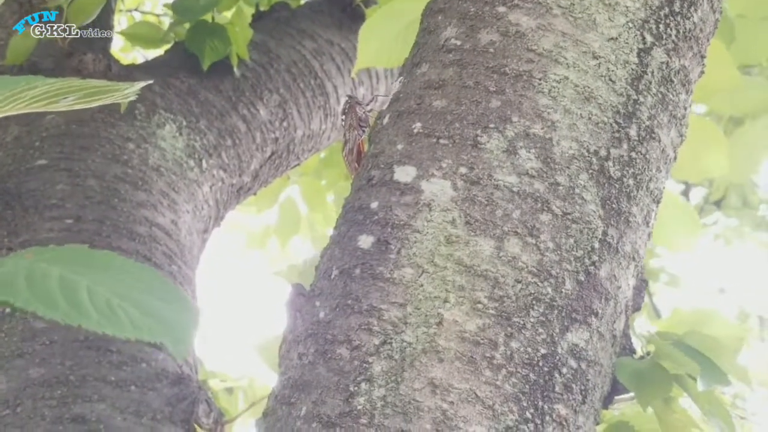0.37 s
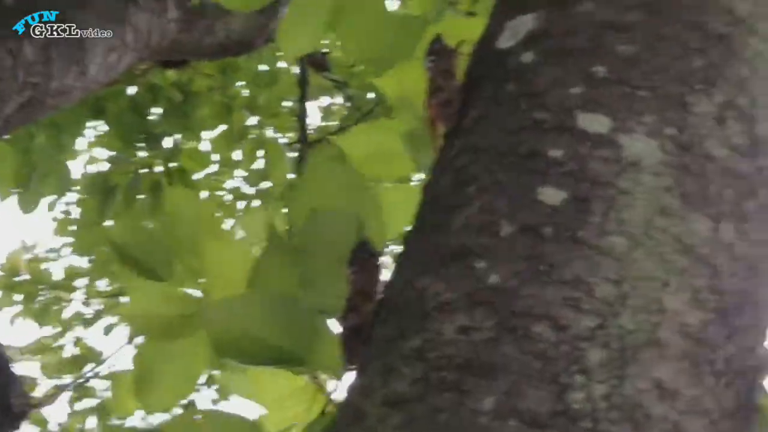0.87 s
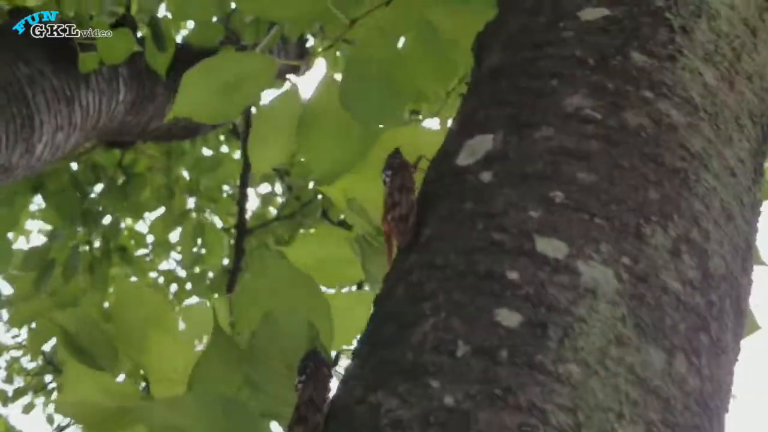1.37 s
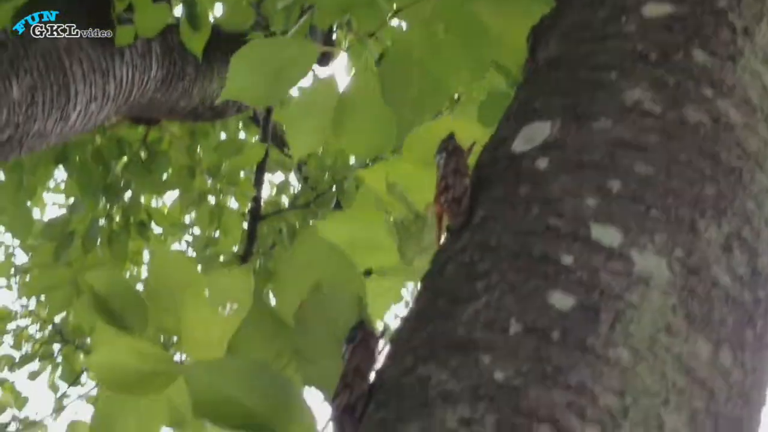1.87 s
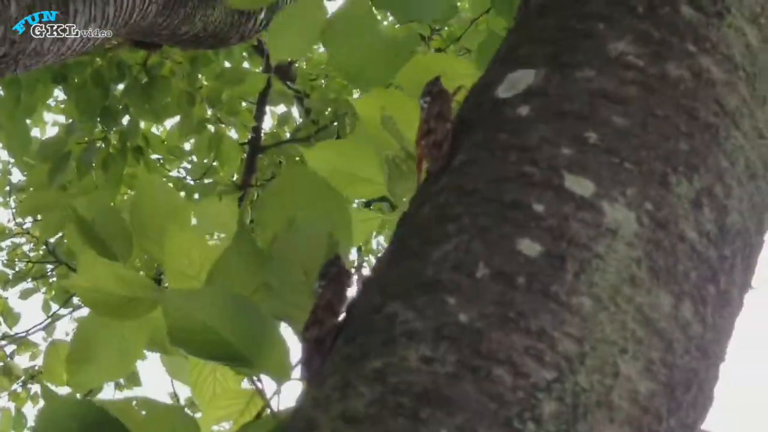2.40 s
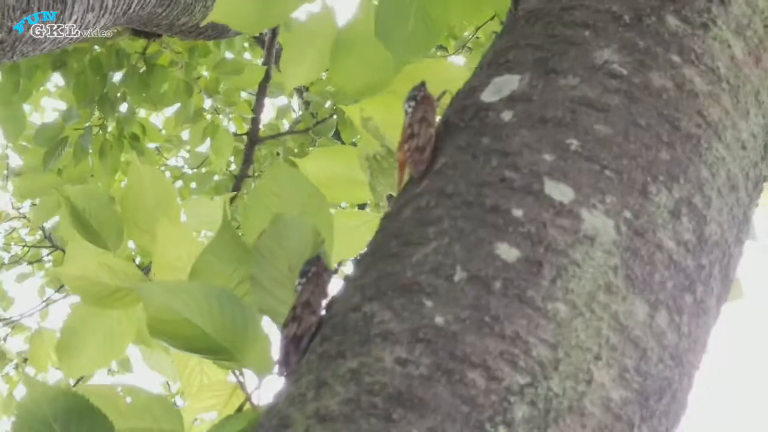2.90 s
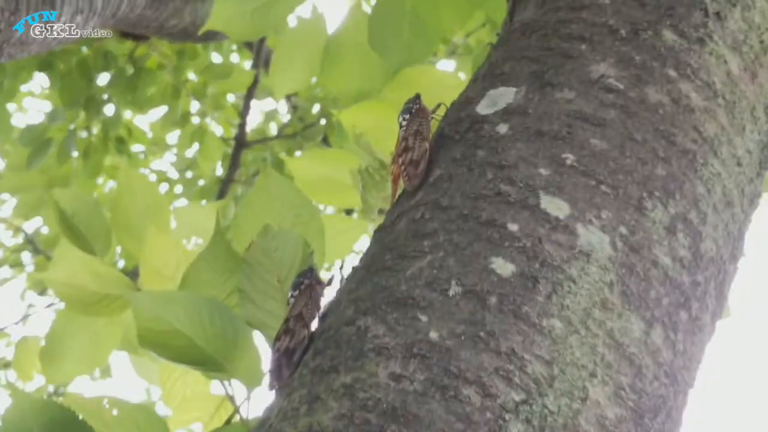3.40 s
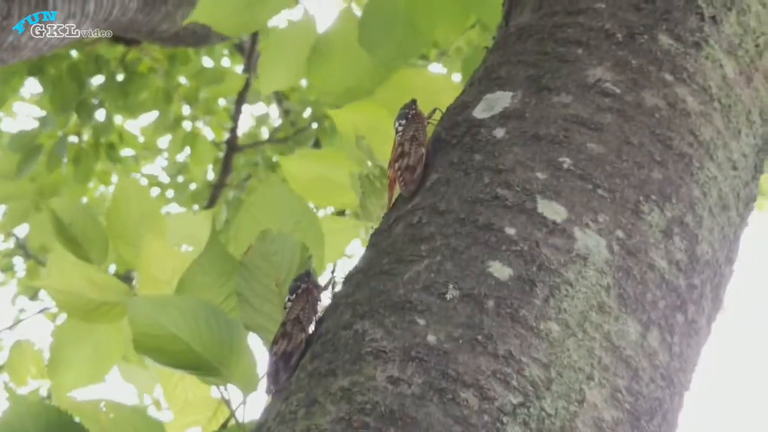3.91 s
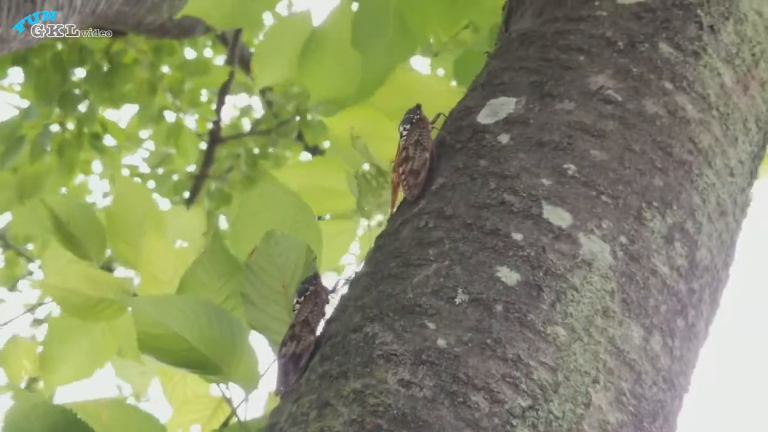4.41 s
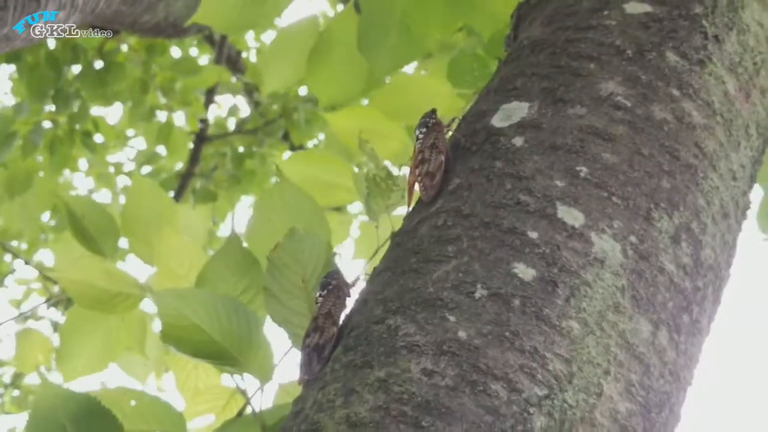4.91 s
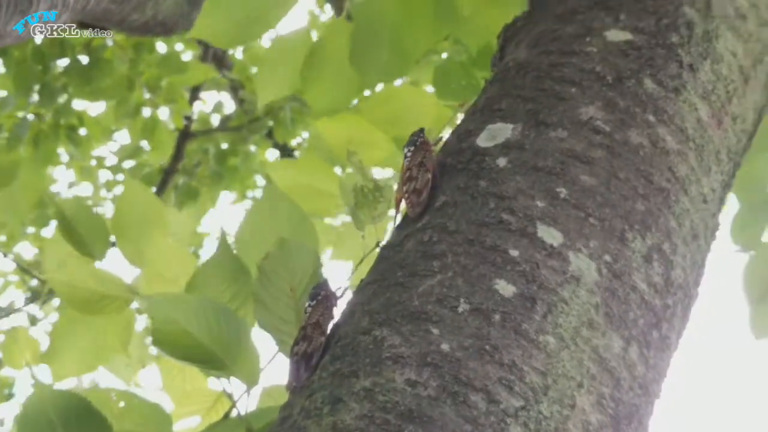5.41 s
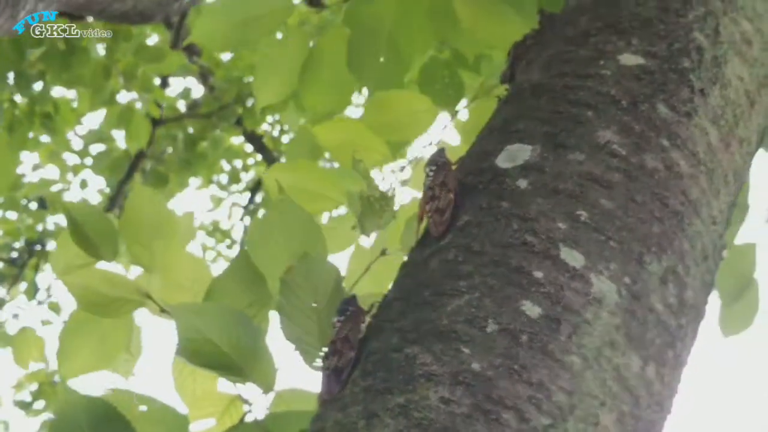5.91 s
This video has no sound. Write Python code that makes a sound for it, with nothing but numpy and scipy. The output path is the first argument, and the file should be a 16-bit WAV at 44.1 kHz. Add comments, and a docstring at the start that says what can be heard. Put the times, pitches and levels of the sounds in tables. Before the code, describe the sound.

Shrill, dense cicada song with a dry buzzing grain. First one insect wavers rapidly between lower and very high pitch; after half a second it stops, exposing another's brisk chirping syllables, each gliding upward, with longer ones closing phrases. At about 2.4 seconds the wavering buzz resumes, overlapping the syllables and slowly growing louder. Soft handling taps and wind buffets on a close stereo microphone recur every two seconds, over light distant insect hiss.

```python
"""A throbbing cicada, its pitch swinging 14 times a second, sings at the start, pauses, and returns at 2.37 s.
A second one sings short rising syllables; its two-second passage, with far chorus, wind and taps, loops.
Both voices are rib clicks ringing resonant modes, heard through a hand-held stereo microphone close by.
Shaped noise makes the far chorus and wind; short damped waves make finger taps and lumps of a gust."""
import sys
import numpy as np
from scipy import signal
from scipy.fft import rfft, irfft, next_fast_len
from scipy.io import wavfile
from scipy.ndimage import uniform_filter1d

SR = 44100
rng = np.random.default_rng(int(sys.argv[2]) if len(sys.argv) > 2 else 0)


def store_pcm(level_fs):
    """Save levels as 16-bit WAV."""
    pcm = np.round(np.clip(level_fs, -1, 1) * 32767).astype(np.int16)
    wavfile.write(sys.argv[1], SR, np.atleast_2d(pcm).T)


def amplitude_ratio(level_db):
    """Convert a level in decibels to the matching linear amplitude (field) ratio."""
    exponent = np.asarray(level_db, float) / 20
    return 10 ** exponent


N = 266143
TIME = np.arange(N) / SR

# Tymbal ribs buckling within one muscle cycle. Each row: share of the cycle, relative click level in dB
# into the low mode, the same into the high mode.
THROB_RIBS = [(0, 28.5, 12.5), (0.321, -7, -28), (0.517, 31, -16), (0.65, -34, 10)]
# Fixed resonances of the body. Each row: centre in Hz, width in Hz, relative level in dB,
# change in dB at full lift of the abdomen.
THROB_BODY = [(2300, 300, -36, 0), (4920, 330, -4, -13), (4250, 220, -21, -10), (8250, 350, -17, 2),
              (10000, 1500, -17, 0), (11650, 350, -11, 3), (13200, 900, -22, 26), (14400, 1100, -30, 32)]
# Level difference of the ports; the right one faces away. Each row: frequency in Hz, left minus right in dB.
THROB_BALANCE = [(2500, 2), (4800, 1.5), (5500, -3.5), (6000, 13.5), (7500, 11.5), (8500, 25), (10000, 1.5),
                 (12000, 14.5), (15500, 20)]
# Phase difference of the ports. Each row: frequency in Hz, lead of the left in radians.
THROB_PHASE = [(3600, .3), (4400, -2), (6500, .2), (16000, .4)]
# Steady paces of the pumping abdomen. Each row: start in seconds, time of one pitch top in seconds,
# swings per second.
SWING_PACE = [(0, .155, 13.95), (1, 2.195, 14.11), (3.683, 3.683, 13.84)]
# Stretches of song. Each row: start in seconds, end in seconds, fade-in in seconds, gain in dB at first.
THROB_SONG = [(-1, .528, .01, -20.8), (2.372, 7, .03, -22.8)]


def throbbing_cicada():
    """Frequency modulation by a pumping abdomen: lift slides the modes up and the high one flares at each top."""
    since, top, pace = np.transpose(SWING_PACE)
    row = np.searchsorted(since, TIME, "right") - 1
    swings = pace[row] * (TIME - top[row])
    lift = pumping(swings, late=.045, middle=0.45, depth=0.83, skew=0.99, smoothing=200)
    ease = 1 / (.0035 * SR)  # the abdomen eases into place with a 3.5 ms time constant
    lift = signal.lfilter([ease], [1, ease - 1], lift)
    flare = pumping(swings, late=.09, middle=0.51, depth=0.86, skew=0.98, smoothing=150)

    muscle_hz = 192.1 + .6 * np.sin(2 * np.pi * .7 * TIME)
    clicks = ribs(muscle_hz, THROB_RIBS, jitter=.0012, spread_db=1.0)
    low_hz, high_hz = 5550 + 2750 * lift, 12400 + 2900 * flare
    high_db = -15 + 28 * abs(flare) ** 0.26
    voice = song(clicks, lift, low_hz, high_hz, high_db, (450, 1000), THROB_BODY, hiss_db=-20.0)
    near = ports(voice * amplitude_ratio(-9.5), THROB_BALANCE, THROB_PHASE, left_echo_db=-11.0, right_echo_db=-22)

    far = far_chorus(THROB_BALANCE, patchy_db=3.5) + amplitude_ratio(-21) * thin_note()
    puff_colour = [(50, -2), (150, -6.0), (500, -6.5), (1300, -19.5), (2000, -16)]  # (Hz, relative dB per Hz)
    puffs = noise(puff_colour, [(50, 2.7), (900, 10.0)], same=0.26, patchy_db=3.0)
    puffs *= amplitude_ratio(-40.0 + 15.1 * lift)

    level = np.zeros(N)
    for start, end, fade, db in THROB_SONG:
        growth_db = 0.68 * np.maximum(TIME - max(start, 0), 0)  # the song swells by 0.68 dB per second
        fade_in = np.clip((TIME - start) / fade, 0, 1) ** 2
        level += amplitude_ratio(db + growth_db) * (TIME < end) * fade_in
    return (near + puffs + amplitude_ratio(-11) * far) * uniform_filter1d(level, size=100)


def pumping(swings, late, middle, depth, skew, smoothing):
    """Phase-skewed oscillation: a cosine of the swing count, limited to 0..1 and smoothed over some samples."""
    phase = 2 * np.pi * (swings - late) + skew * np.sin(np.pi * swings) ** 2
    return uniform_filter1d(np.clip(middle + depth * np.cos(phase), 0, 1), size=smoothing)


# Tymbal ribs of the syllable singer. Each row: share of the muscle cycle, relative click level in dB
# into the low mode, the same into the high mode.
SYLLABLE_RIBS = [(0, 9, 33), (0.199, -15, -11), (0.5, 6.5, -1), (0.718, 14.5, -24.5)]
# Fixed resonances of its body. Each row: centre in Hz, width in Hz, relative level in dB,
# change in dB per unit of lift (1500 Hz of glide).
SYLLABLE_BODY = [(2225, 310, -26.5, 2), (4809, 213, -3.5, -5.5), (5400, 410, -1, 0.5),
                 (8750, 2240, -11, 3.5), (10980, 1120, -12, 8), (11750, 480, -14.5, 12),
                 (15700, 3040, -4.5, 0)]
# Syllables; a long one closes each phrase. Each row: start in seconds, end in seconds, top pitch in Hz,
# timed before the passage is looped.
SYLLABLES = [(0.524, 0.543, 5690), (0.549, 0.623, 7046), (0.64, 0.677, 6080), (0.689, 0.721, 6260),
             (0.75, 0.781, 6413), (0.793, 0.828, 6294), (0.841, 0.889, 6390), (0.892, 0.949, 6960),
             (0.971, 1.008, 5955), (1.02, 1.05, 6350), (1.062, 1.106, 6060), (1.123, 1.16, 6210),
             (1.172, 1.213, 6250), (1.232, 1.316, 6900), (1.348, 1.369, 5785), (1.391, 1.421, 5950),
             (1.437, 1.473, 6126), (1.492, 1.526, 6056), (1.543, 1.576, 6094), (1.598, 1.64, 6205),
             (1.648, 1.714, 6990), (1.746, 1.77, 5780), (1.79, 1.821, 6144), (1.844, 1.87, 6060),
             (1.895, 1.92, 6090), (1.95, 1.981, 6050), (2.001, 2.026, 5950), (2.056, 2.14, 6786),
             (2.163, 2.192, 5400), (2.22, 2.243, 5924), (2.264, 2.299, 5900), (2.32, 2.347, 6020),
             (2.366, 2.397, 5795), (2.42, 2.459, 5820), (2.471, 2.521, 6570)]
# Level difference of the ports. Each row: frequency in Hz, left minus right in dB.
SYLLABLE_BALANCE = [(2500, 0), (4500, -4), (5600, 8.5), (6300, -1), (7200, 32.5), (8900, 38), (9800, 0),
                    (11000, 11.5), (12500, 20.5), (13500, 20), (15500, 16)]
# Phase difference of the ports. Each row: frequency in Hz, lead of the left in radians.
SYLLABLE_PHASE = [(2600, 0), (4500, 2.4), (5700, 3.8), (6600, 6.3), (16000, 6.6)]


def syllable_cicada():
    """A gliding resonance under a gate: each syllable starts abruptly, glides to its top and sags."""
    base_hz, high_syllable_hz = 5500, 6450
    hz, gate = np.full(N, float(base_hz)), np.full(N, amplitude_ratio(-77.0))
    last_start, last_end, last_hz = 0, 0, 0
    for start, end, top_hz in SYLLABLES:
        span = (TIME >= start) & (TIME < end)
        joined = start - last_end < .01  # follows without a gap
        after_stub = last_end - last_start < .025
        # share of the length at which the top comes: high syllables and those joined to a stub arch over
        if joined and after_stub:
            share = .56
        elif top_hz > high_syllable_hz:
            share = .72
        else:
            share = .84
        t, top = TIME[span], start + share * (end - start)
        rising = t < top
        glide = np.where(rising, (t - start) / (top - start), 1 - ((t - top) / .033) ** 2)
        glide += .4 * glide * (1 - glide) * rising  # bowed upward
        head_hz = 447.5 * (joined and not after_stub) * rising  # a joined syllable starts higher
        hz[span] += head_hz + (top_hz - base_hz - head_hz) * np.clip(glide, 0, 1)
        gate[span] = amplitude_ratio(-24.5 - 2.5 * (last_hz > high_syllable_hz))  # weaker after a high one
        last_start, last_end, last_hz = start, end, top_hz
    gate = signal.lfilter([.02], [1, -.98], gate)  # short ring-off
    hz = uniform_filter1d(hz, size=150)

    clicks = ribs(178 + .004 * (hz - base_hz), SYLLABLE_RIBS, jitter=.002, spread_db=2.5)
    lift = (hz - base_hz) / 1500
    high_db = -15 + 22 * np.tanh(lift / 0.37)  # the near-octave grows as the pitch rises
    voice = song(clicks, lift, hz, 1.984 * hz, high_db, (420, 700), SYLLABLE_BODY, hiss_db=-10)
    return ports(amplitude_ratio(-2.0) * gate * voice, SYLLABLE_BALANCE, SYLLABLE_PHASE,
                 left_echo_db=-10, right_echo_db=-2)


def song(clicks, lift, low_hz, high_hz, high_db, widths, body, hiss_db):
    """Source and filter: clicks with hiss ring two sliding modes and the fixed resonances of the body."""
    low, high = (evened(c) + amplitude_ratio(hiss_db) * rng.standard_normal(N) for c in clicks)
    fixed = np.zeros(N)
    for hz, width, db, change_db in body:
        fixed += amplitude_ratio(db + change_db * lift) * ring(low, hz, width)
    return ring(low, low_hz, widths[0]) + amplitude_ratio(high_db) * ring(high, high_hz, widths[1]) + fixed


def ribs(rate_hz, pattern, jitter, spread_db):
    """Impulsive excitation: the ribs click in every muscle cycle, with uneven timing (share of a cycle) and level."""
    cycles = np.cumsum(rate_hz * np.ones(N)) / SR
    starts = np.arange(int(cycles[-1]))
    out = np.zeros((2, N))
    for share, low_db, high_db in pattern:
        late, low, high = rng.standard_normal((len(starts), 3)).T
        at = np.interp(starts + share + jitter * late, cycles, np.arange(N)).astype(int)
        out[:, at] += amplitude_ratio([low_db + spread_db * low, high_db + spread_db * high])
    return out


def ring(x, hz, width):
    """Damped resonance: shifts the curve hz to zero, lets x decay there through three poles, and shifts back."""
    turn = np.exp(2j * np.pi * np.cumsum(hz * np.ones(N)) / SR)
    r = np.exp(-np.pi * width / SR)
    poles = np.poly([r, r ** 2, r ** 3])  # three poles give steep skirts
    return evened((turn * signal.lfilter([1], poles, x / turn)).real)


def ports(x, balance, phase, left_echo_db, right_echo_db):
    """Scattering and directivity: short scattered echoes whose colour changes slowly; ports differ."""
    lag = np.arange(int(.04 * SR)) / SR
    t60_s, turns_per_s = .022, 0.826
    echo = rng.standard_normal((3, 2, len(lag))) * amplitude_ratio(-60 * lag / t60_s) * (lag > .0005)
    echo *= amplitude_ratio([[left_echo_db], [right_echo_db]]) / np.linalg.norm(echo[0, 0])
    # three echo patterns alternate, a third of a turn apart
    turn = np.sqrt(2 / 3) * np.cos(2 * np.pi * (turns_per_s * TIME + np.arange(3)[:, None] / 3))
    echoes = signal.oaconvolve((x * turn)[:, None], echo, axes=2).sum(0)[:, :N]
    left, right = x + echoes
    size = next_fast_len(N)
    hz = np.fft.rfftfreq(size, 1 / SR)
    turned = rfft(right, size) * np.exp(-1j * read(phase, hz)) / amplitude_ratio(read(balance, hz))
    return np.array([left, irfft(turned, size)[:N]])


# Finger taps near the right port. Each row: time in seconds, peak in dB (mean of both ports),
# frequency in Hz once the first push has settled.
TAPS = [(.858, -39, 193), (1.254, -25.5, 176), (1.493, -27, 232.8), (2.142, -27, 168.9), (2.17, -32, 127.9)]


def finger_taps():
    """Damped oscillation after an impulse: a sharp low push and a cycle of recoil, mostly on the right."""
    out, t = np.zeros((2, N)), np.arange(1500) / SR
    rise_s = 0.00017
    for s, db, hz in TAPS:
        bent = t + 0.0029 * (1 - np.exp(-t / 0.00091))  # the first push is quicker
        push = np.sin(2 * np.pi * hz * bent) * np.exp(-t * hz / 0.54)
        push *= (1 - np.exp(-t / rise_s)) ** 2
        at = round((s - rise_s) * SR)
        out[:, at:at + len(t)] += amplitude_ratio(db) * np.outer(panned(-23), push / abs(push).max())
    return out


# Lumps of the gust on the left port. Each row: peak time in seconds, peak in dB (mean of both ports),
# frequency in Hz after the peak.
LUMPS = [(2.222, -27, 190.9), (2.304, -15.5, 122), (2.335, -22, 100.9), (2.3818, -13.5, 150.5),
         (2.453, -21.5, 150), (2.483, -21, 125)]


def gust_lumps():
    """Transient pressure waves: a few cycles that swell and die, quicker before the peak than after it."""
    out = np.zeros((2, N))
    for s, db, hz in LUMPS:
        cycles = hz * (TIME - s)
        wave = np.cos(2 * np.pi * cycles * np.where(cycles < 0, 1.54, 1))
        push = wave * np.exp(-abs(cycles) / 0.84)  # swells or dies by 1/e in 0.84 / hz seconds
        out += amplitude_ratio(db) * np.outer(panned(35), push)
    return out


def scrape_and_hum():
    """Resonant noise: a finger slides briefly near the right port; narrow bands waver as a faint distant hum."""
    since = TIME - 2.14
    fall_db = -34.0 - 60 * abs(since) / 0.21
    scrape = ring(rng.standard_normal(N), 370, 760) * amplitude_ratio(fall_db) * (since > 0)
    hum = amplitude_ratio(-62.5) * ring(rng.standard_normal(N), 224.7, 5)
    hum += amplitude_ratio(-57) * ring(rng.standard_normal(N), 145.9, 8.9)
    return np.outer([.2, 1], scrape) + hum


# Spectrum of the far chorus. Each row: frequency in Hz, relative level in dB per Hz.
FAR = [(410, -26.5), (700, -24.5), (1600, -28), (2400, -16.5), (2870, -23.5), (3580, -30.5), (4300, -16),
       (4800, -6), (6020, 4), (7120, -3.5), (8110, 0.5), (9230, -9.5), (12000, -9.5), (13600, -7),
       (15500, -7.5)]


def far_chorus(balance, patchy_db):
    """Incoherent superposition: the far singers blend into shaped noise, partly alike in both ports."""
    return noise(FAR, balance, same=0.45, patchy_db=patchy_db)


def thin_note():
    """Slow random frequency modulation: a distant insect holds one thin, slightly breathy note."""
    centre_hz = 2465
    hz = centre_hz + 18 * evened(uniform_filter1d(rng.standard_normal(N), size=1500))
    return np.sin(2 * np.pi * np.cumsum(hz) / SR) + .3 * ring(rng.standard_normal(N), centre_hz, 80)


# Spectrum of the wind. Each row: frequency in Hz, relative level in dB per Hz.
WIND = [(15, -28), (32, -5), (50, 1), (86, 1.5), (234, -12), (386, -18.5), (454, -28), (543, -21),
        (1200, -49), (1560, -74), (2640, -120)]


def wind():
    """Turbulent pressure noise: a low rumble, calmer at first, with a gust that also rattles higher up."""
    rise = (TIME - 2.073) / 0.21
    fall = 1 - (TIME - 2.485) / 0.038
    gust = np.clip(np.minimum(rise, fall), 0, 1)
    unevenness = evened(signal.lfilter([1], [1, -.998], rng.standard_normal((2, N))))
    lull_db = -7 * (TIME < .54)
    gust_db = np.outer((14, 13), gust)  # lift at the left and right port
    level_db = -47.5 + lull_db + gust_db + 1.24 * unevenness
    rumble = noise(WIND, [(50, 0), (900, 0)], same=0.81, patchy_db=1.5)
    rattle = np.array([ring(v, 276, 140) for v in rng.standard_normal((2, N))])
    rattle *= amplitude_ratio(4.3 * (level_db + 33.0) - 3.0 + 1.0 * unevenness)  # grows far faster than the rumble
    return amplitude_ratio(level_db) * (rumble + rattle)


def noise(spectrum, balance, same, patchy_db):
    """Spectral shaping and partial coherence: two-channel noise with patches that drift in time and pitch."""
    frames, hz = N // 256 + 5, np.fft.rfftfreq(1024, 1 / SR)
    a, b, c, d, patches = rng.standard_normal((frames, 513, 5)).T
    patches = evened(uniform_filter1d(uniform_filter1d(patches, size=10, axis=0), size=6, axis=1))
    colour_db = read(spectrum, hz)[:, None]
    left = (a + 1j * b) * amplitude_ratio(colour_db + patchy_db * patches)
    other = (c + 1j * d) * amplitude_ratio(colour_db + patchy_db * patches[:, ::-1])
    right = (same * left + np.sqrt(1 - same ** 2) * other) / amplitude_ratio(read(balance, hz))[:, None]
    return evened(signal.istft(np.array([left, right]), nperseg=1024, noverlap=768)[1][:, :N])


def evened(x):
    """Power normalisation: scales to rms 1."""
    return x / np.sqrt(np.mean(x ** 2) + 1e-20)


def read(points, hz):
    """Interpolation of a spectrum table on a log-frequency axis."""
    f, value = np.transpose(points)
    return np.interp(np.log(hz + 1), np.log(f + 1), value)


def panned(pan_db):
    """Level-difference panning: left and right gains of mean 1, left minus right in dB."""
    sides = amplitude_ratio([pan_db / 2, -pan_db / 2])
    return sides / sides.mean()


def scene():
    """Superposition: the syllable passage loops with a brief dip at each join, under the throbbing cicada."""
    breeze = wind()
    passage = syllable_cicada() + amplitude_ratio(-32.0) * far_chorus(SYLLABLE_BALANCE, patchy_db=2.5)
    passage += breeze + finger_taps() + gust_lumps() + scrape_and_hum()
    first, length = round(.531 * SR), round(2.002 * SR)
    piece = passage[:, first:first + length] * signal.windows.tukey(length, .006)
    looped = np.concatenate([breeze[:, :first], piece, piece, piece], axis=1)[:, :N]
    click_at = round(5.6987 * SR)  # a brief click of overload on the left
    looped[0, click_at:click_at + 9] -= amplitude_ratio(-22) * np.hanning(9)
    return looped + throbbing_cicada()


def low_pass(x):
    """Removes everything above the highest recorded frequency."""
    return signal.sosfilt(signal.butter(12, 16820, fs=SR, output="sos"), x)


def record(dry):
    """Band limiting and overload: a steep low-pass at 15780 Hz, then peaks beyond full scale are clipped."""
    lowpass = signal.firwin(801, 15780, window=("kaiser", 10), fs=SR)
    limited = signal.oaconvolve(dry, lowpass[None], "same")
    return low_pass(np.clip(limited, -1, 1))


dry = scene()
out = record(dry)
store_pcm(out)
```